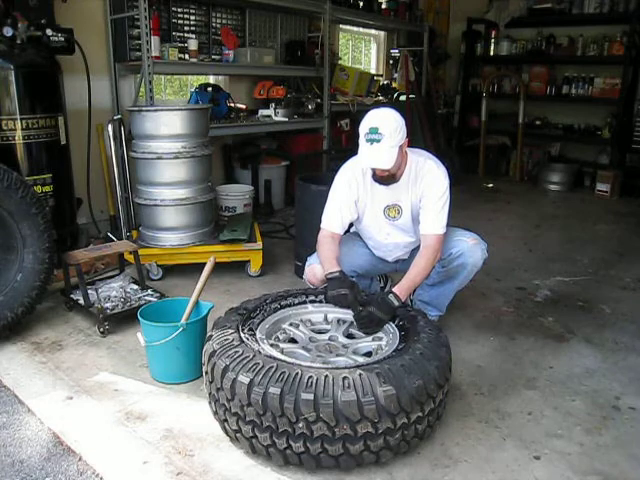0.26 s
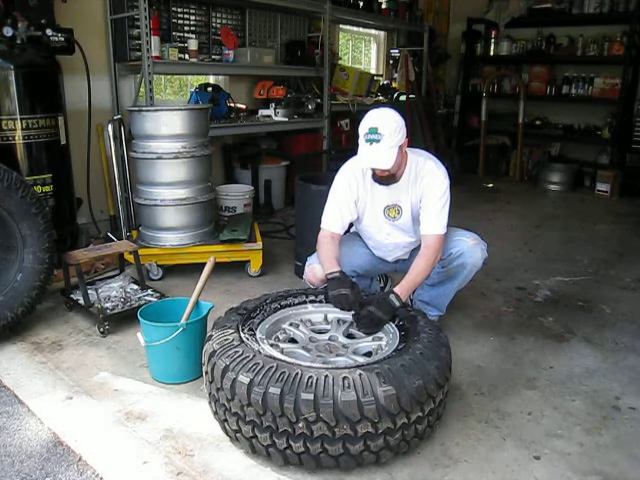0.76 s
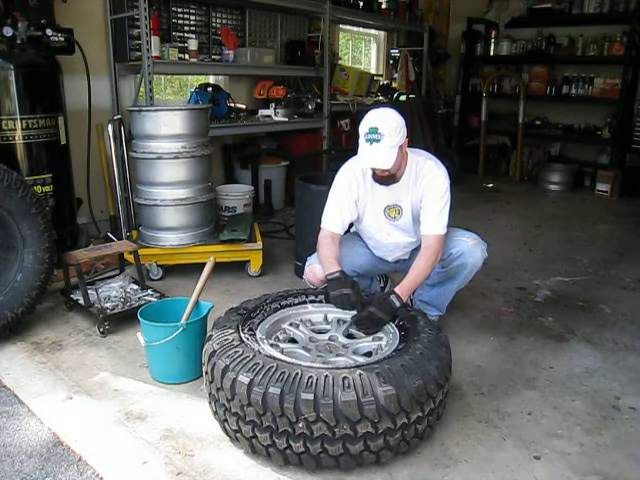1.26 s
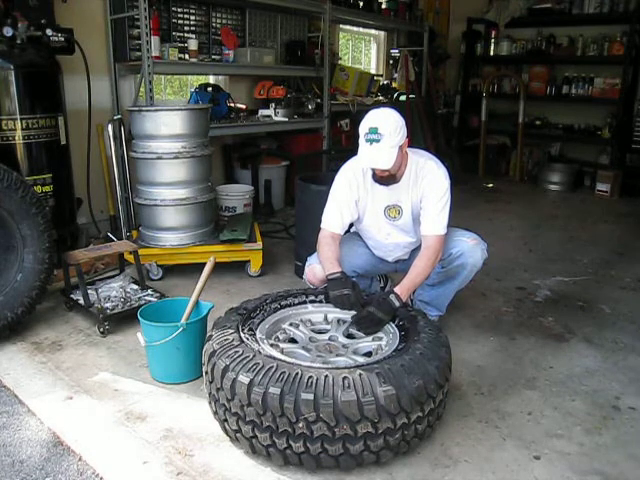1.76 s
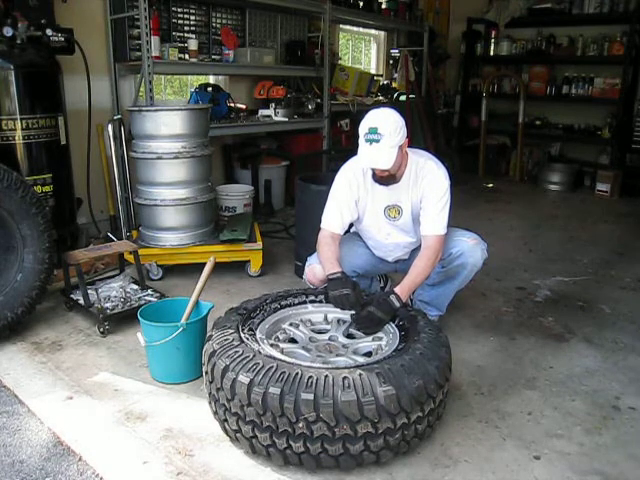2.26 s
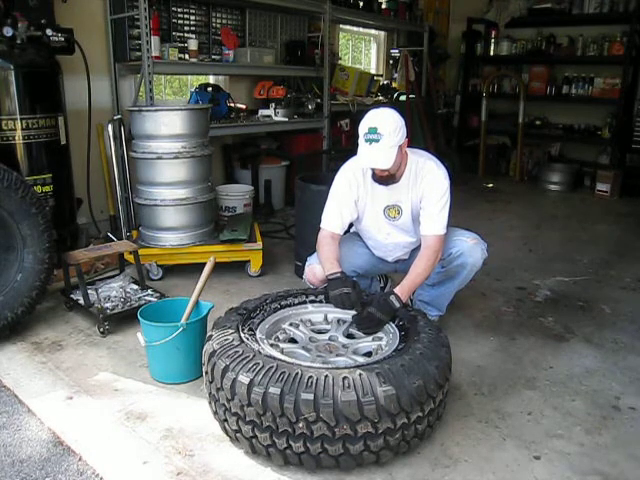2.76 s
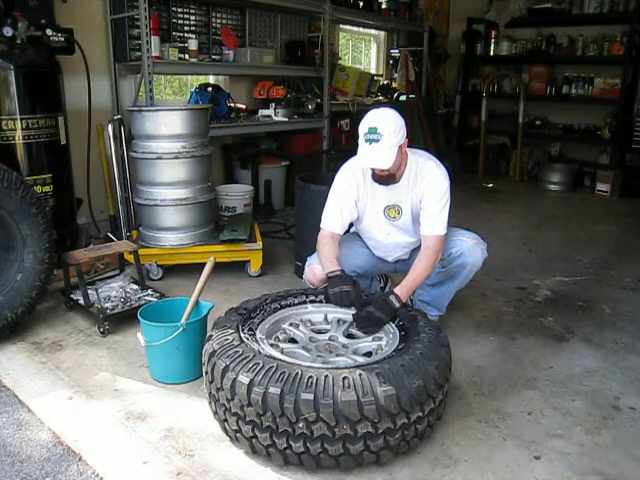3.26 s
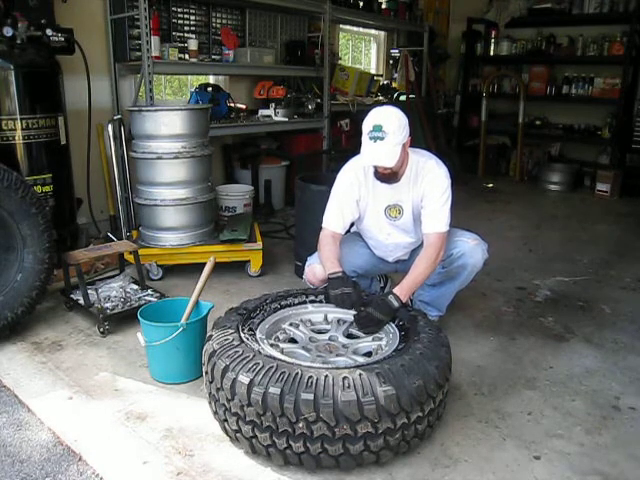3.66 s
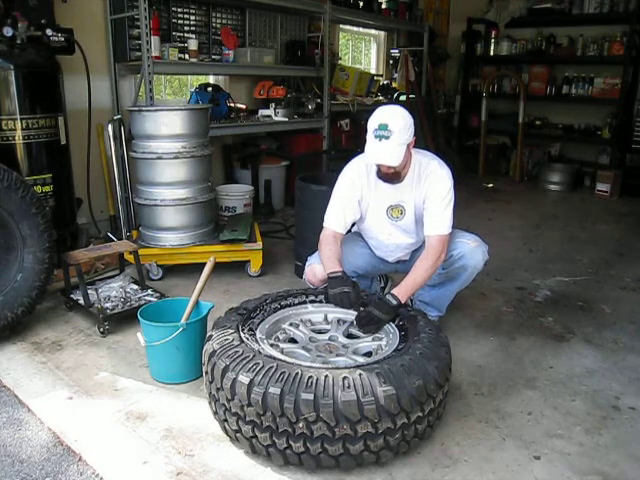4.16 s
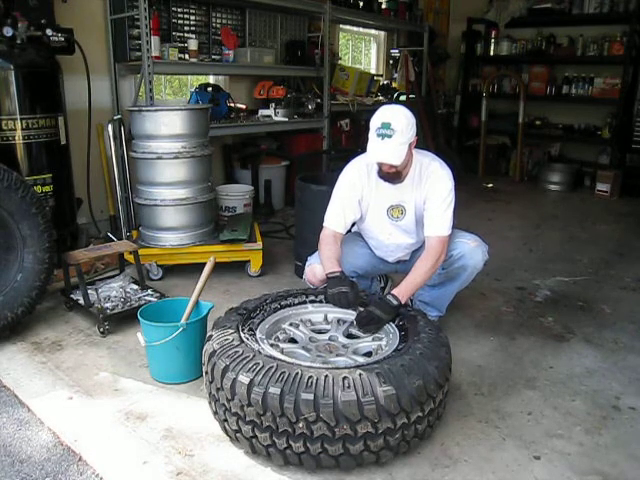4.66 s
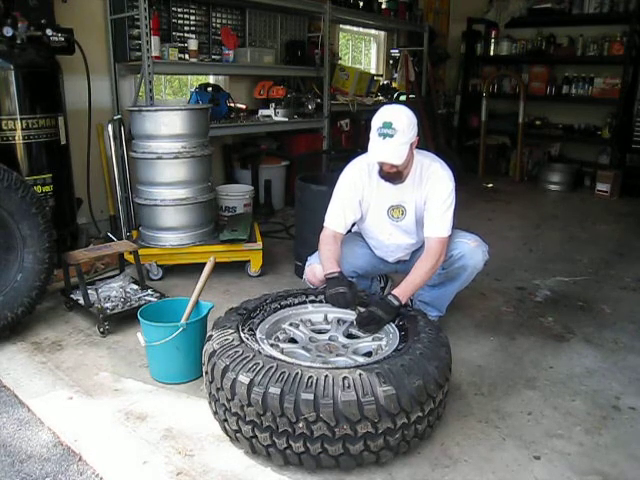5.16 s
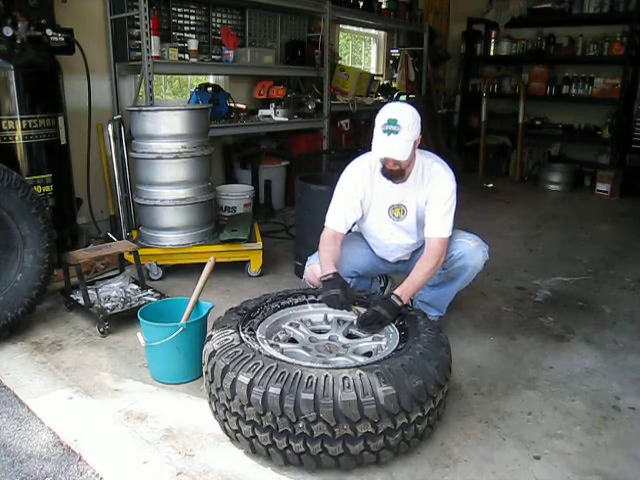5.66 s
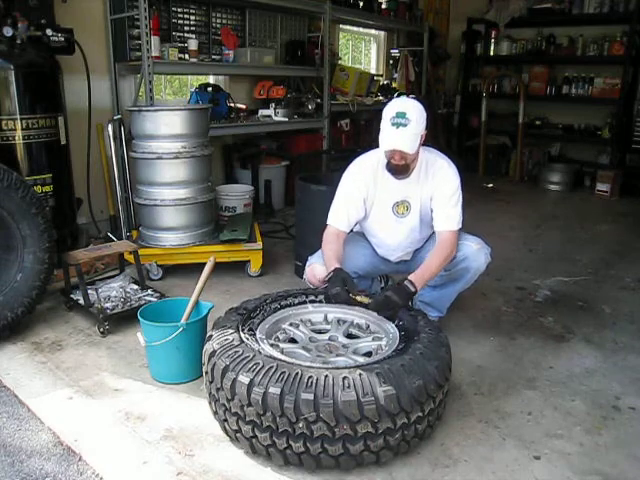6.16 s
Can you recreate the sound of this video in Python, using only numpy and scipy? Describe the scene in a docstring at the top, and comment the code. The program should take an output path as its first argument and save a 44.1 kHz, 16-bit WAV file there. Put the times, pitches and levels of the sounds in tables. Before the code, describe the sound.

Thin, uneven air seeps in a quiet garage, then a sharp spit opens a strong sustained hiss that turns airier and more sizzling.

```python
"""A garage: the core is unscrewed from the valve of a truck tire on the floor, two metres from the microphone.
Air seeps past the thread in thin, uneven spurts, then rushes out around the tool and the gloved hand.
Shaped noise makes the hisses, the jet and its buffets on the glove; narrow noise makes gap, hollow,
bore and chamber ring. Hollow and bore ring less, and the sizzle grows, as the tool draws back.
Reflections off rim and room are added, and outdoor wash and hum come through the open door."""
import sys
import numpy as np
from scipy import signal
from scipy.fft import rfft, irfft
from scipy.io import wavfile
from scipy.ndimage import map_coordinates

SR = 44100
rng = np.random.default_rng(int(sys.argv[2]) if len(sys.argv) > 2 else 0)


def to_wav(s):
    """Save 16-bit WAV."""
    ch = np.atleast_2d(s).T  # columns
    pcm = np.round(np.clip(ch, -1, 1) * 32767)  # PCM
    wavfile.write(sys.argv[1], SR, pcm.astype(np.int16))


N = 282353
TIME = np.arange(N) / SR  # s

# resonances of the hollow at the valve: f/Hz, width/Hz, level/dB
HOLLOW_MODES = [(1245, 210, -7), (1408.5, 305, -5), (2348, 830, -9.5)]


def gain_of(db):
    """Level definition: amplitude ratio from decibels."""
    return 10 ** (np.asarray(db) / 20)


def evened(x):
    """Power normalisation: scales a signal to an rms of 1."""
    return x / np.sqrt(np.mean(x ** 2) + 1e-20)


def follow(rows):
    """Linear interpolation: one value per sample for each column of a curve."""
    s, *columns = np.transpose(rows)
    return [np.interp(TIME, s, column) for column in columns]


def noise(colour):
    """Spectral shaping: white noise filtered to the given spectrum, with rms 1."""
    hz, db = np.transpose(colour)
    log_bins = np.log(np.fft.rfftfreq(N, 1 / SR) + 1)
    shape = gain_of(np.interp(log_bins, np.log(hz), db))
    white = rng.standard_normal(N)
    return evened(irfft(rfft(white) * shape, N))


def blown(hz, width_hz, size=N):
    """Resonance driven by turbulence: narrow noise of rms 1 around a fixed or moving pitch."""
    r = np.exp(-np.pi * abs(width_hz) / SR)
    drive = rng.standard_normal(size) + 1j * rng.standard_normal(size)
    # low-passed complex noise is the slow envelope; the carrier shifts it up to the pitch
    slow = signal.lfilter([1], [1, -2 * r, r * r], drive)
    phase = 2 * np.pi * np.cumsum(hz * np.ones(size)) / SR
    return evened((slow * np.exp(1j * phase)).real)


def ringing(modes):
    """Modal superposition: all the resonances of one cavity, blown together."""
    return sum(gain_of(db) * blown(hz, width) for hz, width, db in modes)


def drift(size=48):
    """Band-limited random motion: wandering of rms about 1, as of a hand that is never quite still."""
    steps = rng.standard_normal(size)
    smooth = signal.resample(steps, 16 * size)
    return np.interp(TIME, np.linspace(0, TIME[-1], 16 * size), smooth)


def restless(hz, width_hz, wander=.005, swell_db=1.5):
    """Perturbed resonance: pitch and strength shift as the tool moves in the opening."""
    moving_hz = hz * (1 + wander * drift())  # wander is an rms fraction of the pitch
    return blown(moving_hz, width_hz) * gain_of(swell_db * drift())


def gate(s, length, edge):
    """Amplitude window: opens at s and shuts after length, with linear edges; all in seconds."""
    return np.clip(np.minimum(TIME - s, s + length - TIME) / edge + .5, 0, 1)


def bursts(rows, rise_s, fall_s):
    """Transient envelopes: events that each rise linearly, hold and die away exponentially."""
    total = 0
    for s, length, db in rows:
        rise = np.clip((TIME - s) / rise_s + .5, 0, 1)
        fall = np.exp(-np.maximum(TIME - s - length, 0) / fall_s)
        total = total + gain_of(db) * rise * fall
    return total


def flutter(depth_db):
    """Amplitude modulation by turbulence: quick random unsteadiness of a flow, depth_db rms."""
    return gain_of(depth_db * noise([(2, -20), (10, 0), (40, -5), (150, -22), (600, -70)]))


def tilting():
    """Flow restriction: change in dB as the core tilts in its seat and widens or pinches the passage."""
    # tilts of the core: t/s, length/s, change of flow/dB
    tilts = [(.945, .17, -2), (1.948, 0.15, -22), (3.334, 0.063, -3), (3.451, 0.023, 2.5),
             (3.67, 0.092, -1), (3.824, 0.057, -3.5), (3.89, 0.11, 0.5), (4.46, 0.051, 1.5),
             (5.648, 0.14, -1.5), (5.859, 0.053, 2)]
    return sum(db * gate(s, length, edge=0.0093) for s, length, db in tilts)


def outflow(close_db, clear_db, steepness=1):
    """Power law of flow noise: steepness dB per dB of flow, from close_db (tool on) to clear_db (tool back)."""
    # outflow of the opening valve, against that at 3.2 s: t/s, level/dB
    flow_curve = [(2.15, -69), (2.44, -23), (2.64, -27.5), (2.9, -26), (3.03, -14), (3.055, -5),
                  (3.14, -3.5), (3.2, 0), (4.25, 1), (5.5, 2.5), (6.39, 0)]
    # how far the tool is drawn back from the mouth of the valve: t/s, clearance (0-1)
    clearance_curve = [(3.1, 0), (3.55, 0.18), (3.9, 0.05), (4.2, 0.62), (4.33, 0.62), (4.42, 0.35),
                       (5.0, 0.47), (5.33, 0.48), (5.95, 0.38), (6.18, 1)]
    flow, = follow(flow_curve)
    clearance, = follow(clearance_curve)
    position_db = close_db + (clear_db - close_db) * clearance
    return gain_of(steepness * (flow + tilting()) + position_db)


def lifted(db):
    """Change of acoustic coupling: gain that goes from 0 dB to db as the tool lifts off the valve."""
    lift_s, takes_s = 5.22, 0.067
    return gain_of(db * np.clip((TIME - lift_s) / takes_s + .5, 0, 1))


def seep(spurt_db=-1, flutter_db=1.0, loose_db=-3):
    """Turbulent leakage: hiss through the thread with short whistles; the gap rings less as the core loosens."""
    # spectrum of the leak: f/Hz, level per Hz/dB
    leak_colour = [(300, -36), (1500, -13.5), (3700, -6), (4600, -5), (5000, 1), (6000, -6.5), (7000, -3.5),
                   (8100, 2.5), (8600, 0.5), (9500, -3), (11000, 1), (12800, 0), (14200, 2), (15200, 0)]
    # resonances of the narrow gap: f/Hz, width/Hz, level/dB
    gap_modes = [(9350, 260, -10.5), (9800, 330, -9.5), (12150, 220, -16)]
    # steady leak, growing unevenly as the core loosens, until the jet takes over: t/s, level/dB
    leak = [(0.2, -56), (0.65, -50), (1.22, -57), (1.45, -49), (1.68, -55), (2.14, -48.5), (2.99, -44),
            (3.15, -67)]
    # spurts on top of the leak, one for each twist of the tool: t/s, length/s, level before spurt_db/dB
    spurts = [(0.0, 0.067, -43), (.105, 0.023, -46.5), (.3, .07, -41.5), (.42, 0.024, -52),
              (.53, 0.029, -47), (.69, 0.053, -50), (.84, 0.075, -51.5), (1.135, 0.034, -47),
              (1.25, 0.02, -54), (1.33, 0.063, -53), (1.83, .1, -65)]
    # brief fuzzy whistles at the thread: t/s, length/s, f/Hz, width/Hz, level/dB
    whistle_rows = [(0.087, 0.046, 8000, 1500, -51), (.515, .06, 14200, 1300, -50),
                    (.67, .08, 7950, 1500, -57), (0.913, 0.026, 7800, 1000, -53),
                    (1.127, .06, 14450, 1500, -53), (1.735, 0.05, 8320, 1600, -52),
                    (2.43, 0.064, 6800, 785, -51.5), (2.817, 0.069, 4900, 2560, -51.5)]

    steady = gain_of(follow(leak)[0] + tilting())
    level = steady + gain_of(spurt_db) * bursts(spurts, rise_s=0.039, fall_s=0.012)
    gap = sum(gain_of(db) * restless(hz, width) for hz, width, db in gap_modes)
    tightness = gain_of(np.interp(TIME, [.9, 1.4], [1, loose_db]))
    hiss = level * (noise(leak_colour) + tightness * gap)
    whistles = 0
    for s, length, hz, width, db in whistle_rows:
        whistles = whistles + gain_of(db) * gate(s, length, .02) * blown(hz, width)
    return (hiss + whistles) * flutter(flutter_db)


def hollow():
    """Cavity resonance: the hollow rings with the air that crosses it, less as the tool draws back."""
    # hoots as the air catches the edge of the hollow: t/s, length/s, level/dB
    hoots = [(0.0, 0.076, -50.5), (.305, .06, -46), (1.135, .06, -52.5), (1.255, 0.021, -46),
             (2.36, 0.22, -55.5), (2.67, 0.068, -49.5), (2.96, 0.1, -48), (3.055, .06, -38),
             (3.125, 0.034, -32.5), (3.395, 0.036, -34.5), (3.72, 0.27, -37), (5.88, 0.04, -43),
             (6.01, 0.14, -45)]
    level = outflow(close_db=-35.5, clear_db=-49.5, steepness=0.77) * lifted(db=-11)
    level += bursts(hoots, rise_s=0.013, fall_s=0.0088)
    return level * ringing(HOLLOW_MODES)


def yard(rumble_db=-57):
    """Ambient noise: dull outdoor wash and hum, lower and uneven under the jet; a short low rumble at first."""
    # spectrum of the wash through the open door: f/Hz, level per Hz/dB
    wash_colour = [(20, -10), (50, -6), (140, -3), (280, -2), (850, 0), (1150, -2.5), (1700, -7.5),
                   (3000, -11.5), (8000, -14.5), (16000, -21)]
    # level of the wash, with the hum following it: t/s, level/dB
    wash_level = [(0, -49), (3.16, -49), (3.25, -61), (3.7, -62), (4.1, -62), (5.0, -74), (5.6, -62),
                  (6.4, -77)]
    # faint hum, against the wash: f/Hz, width/Hz, level/dB
    hum_modes = [(102, 4, -18)]
    wash = gain_of(follow(wash_level)[0]) * (noise(wash_colour) + ringing(hum_modes))
    rumble = noise([(20, 3), (45, -8), (90, 3), (160, -26), (600, -70)])
    return wash + gain_of(rumble_db) * gate(0, 0.27, .03) * rumble


def spits(hollow_db=-7, edge=0.0013):
    """Impulsive excitation: short puffs of broad noise that also sound the hollow."""
    # puffs as the core shifts in its seat: t/s, length/s, level/dB
    puff_rows = [(0.31, 0.041, -59), (0.355, 0.018, -47), (1.253, 0.027, -45), (3.151, 0.014, -20.5),
                 (3.173, 0.0073, -18), (3.427, 0.034, -38), (3.891, 0.025, -26), (5.867, 0.025, -34)]
    puffs = sum(gain_of(db) * gate(s, length, edge) for s, length, db in puff_rows)
    colour = [(100, -44), (1200, -8.0), (3000, 3.0), (6500, 5.5), (9500, 11.0), (12000, 3.0), (16000, -8.0)]
    return puffs * (noise(colour) + gain_of(hollow_db) * ringing(HOLLOW_MODES))


def jet():
    """Jet noise: rush from the mixing air, sizzle from the finest eddies, low roar where they hit the glove."""
    # spectra of rush, sizzle and roar: f/Hz, level per Hz/dB
    rush_colour = [(200, -56), (600, -19), (1100, -8.5), (1800, -5), (2250, -3), (2700, -6), (3800, 0),
                   (5200, 1.5), (6900, 0.1), (7750, -1), (9300, 2.5), (10700, -2.5), (13000, -25),
                   (16000, -21)]
    sizzle_colour = [(2000, -28.5), (6000, -8.5), (9000, -1), (11500, 4), (13000, 2.5), (14050, 4.5),
                     (15200, 2), (15800, -7)]
    roar_colour = [(80, -34), (170, -22), (340, -9), (430, -14.5), (520, 0), (800, 5), (1150, -0.5),
                   (1800, -32), (4000, -13)]
    # the jet strikes the glove: t/s, length/s, level/dB
    buffets = [(3.02, 0.037, -52), (3.15, 0.0086, -39), (3.36, 0.34, -49), (3.9, 0.12, -58),
               (4.44, 0.2, -49.5), (5.21, 0.67, -42.5), (6.025, 0.15, -42), (6.2, 0.15, -46)]
    rush = outflow(close_db=-26.5, clear_db=-35) * noise(rush_colour)
    sizzle = outflow(close_db=-34.5, clear_db=-28.5) * noise(sizzle_colour)
    roar = bursts(buffets, rise_s=0.028, fall_s=0.033) * noise(roar_colour)
    return rush + sizzle + roar


def bore(reach_octaves=0.96):
    """Flow-excited resonance: as the opening widens the eddies grow, and come to drive lower bore modes."""
    # resonances of the bore: f/Hz, width/Hz, level/dB
    bore_modes = [(4078, 250, 2.5), (4200, 200, 2), (5890, 280, -1.5), (6395, 510, 6), (6870, 140, -1),
                  (8510, 500, 4.5), (11350, 740, 4)]
    # pitch that the eddies drive most strongly: t/s, f/Hz
    eddies = [(3.05, 8100), (3.5, 9400), (3.72, 9050), (3.9, 6500), (4.4, 5050), (5.2, 4230)]
    # sag of the bore's pitch as the air cools the valve: t/s, factor (ratio)
    pitch_sag = [(3.3, 1.025), (3.5, 1.003), (4.4, .99), (5.0, .99), (5.4, .965)]
    driven_hz, = follow(eddies)
    sag, = follow(pitch_sag)
    shares = []
    for hz, _, db in bore_modes:
        octaves_off = np.log2(hz / driven_hz)
        shares.append(gain_of(db) * np.exp(-.5 * (octaves_off / reach_octaves) ** 2))
    tones = sum(share * restless(hz * sag, width) for share, (hz, width, _) in zip(shares, bore_modes))
    level = outflow(close_db=-28, clear_db=-45.5, steepness=2.5) * lifted(db=-10)
    return level * tones / np.linalg.norm(shares, axis=0)  # the shares' total power stays constant


def chamber():
    """Enclosed-air resonance: the tire hums faintly with the outflow, more once the tool is off the valve."""
    # resonances of the air chamber of the tire: f/Hz, width/Hz, level/dB
    chamber_modes = [(198, 43, 0.5), (492, 15, -1.5)]
    boom = gain_of(-59.5) * gate(3.32, .14, 0.058)  # one boom, soon after the valve opens
    hum_level = outflow(close_db=-79, clear_db=-84) * lifted(db=7.5)
    return (hum_level + boom) * ringing(chamber_modes)


def rim(x, sway_s=.00003):
    """Comb filtering: close reflections off the rim and the floor, on paths that sway with the hand."""
    total = 0
    for delay_s in (.0021, .0047):
        arrival = (TIME - delay_s - sway_s * drift()) * SR
        total = total + map_coordinates(x, [arrival], order=3)
    return total


def garage(x, t60=0.26, count=12):
    """Reverberation: reflections off floor, walls and shelves; the pattern changes as the hand steers the jet."""
    t = np.arange(SR // 2) / SR
    decay = gain_of(-60 * t / t60) * (t > .003)
    out = np.zeros(N)
    spacing = TIME[-1] / (count - 1)
    for place in np.linspace(0, TIME[-1], count):
        signs = rng.choice([-1, 1], len(t))
        taps = decay * signs * (rng.random(len(t)) < 2000 / SR)  # about 2000 reflections per second
        # each pattern crossfades into the next
        aim = np.cos(np.pi / 2 * np.minimum(abs(TIME - place) / spacing, 1))
        out += signal.fftconvolve(x * aim, taps / np.linalg.norm(taps))[:N]
    return out


def scene(rim_db=-17, room_db=-8):
    """Superposition: valve, garage and yard, heard by one microphone that feeds both channels."""
    gusts = flutter(.3)  # shared by all that the jet drives at the valve
    air = seep() + (hollow() + jet() + bore()) * gusts + spits() + chamber()
    mono = air + gain_of(rim_db) * rim(air) + gain_of(room_db) * garage(air) + yard()
    return np.array([mono, mono])


def record(dry):
    """Band limitation: a steep linear-phase low-pass at the top of the microphone's range."""
    edge_hz = 15780
    low_pass = signal.firwin(1023, edge_hz, window=("kaiser", 9), fs=SR)
    return signal.oaconvolve(dry, low_pass[None], "same", axes=1)


dry = scene()
out = record(dry)
to_wav(out)
```